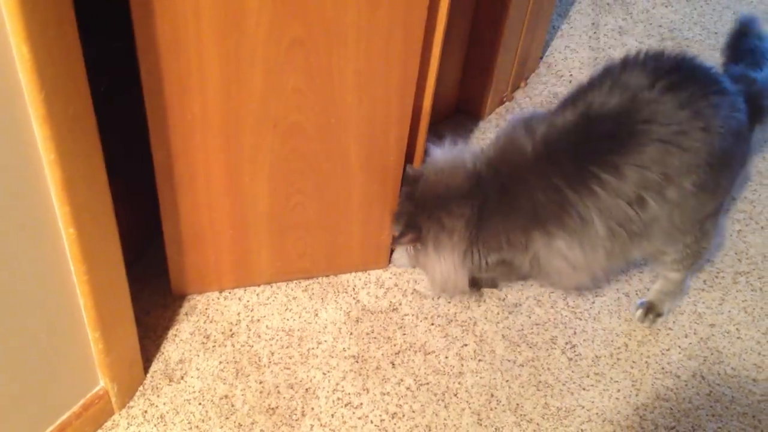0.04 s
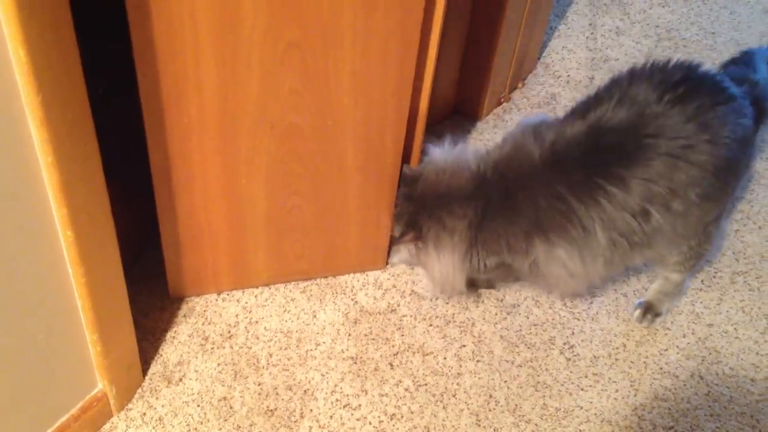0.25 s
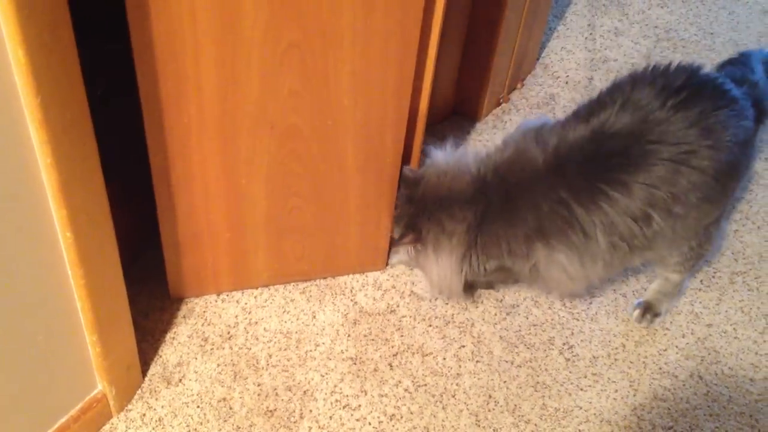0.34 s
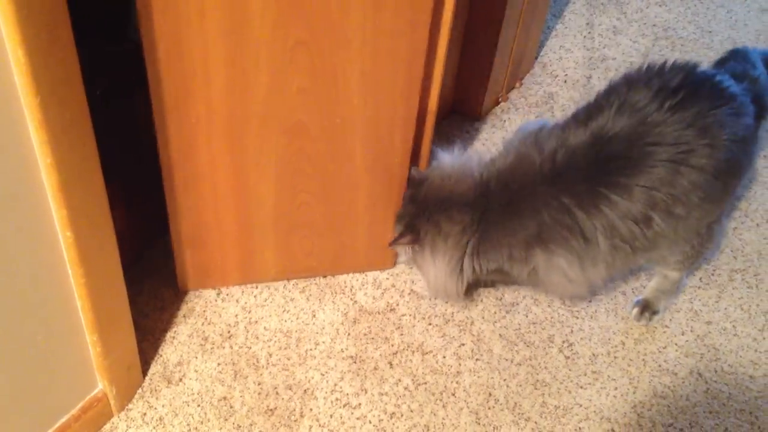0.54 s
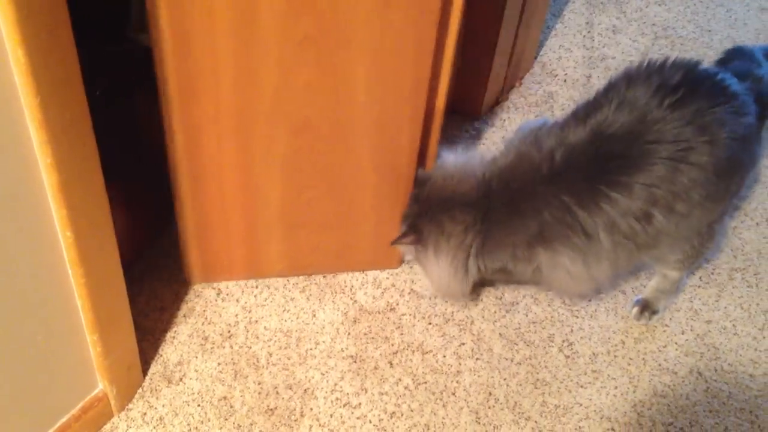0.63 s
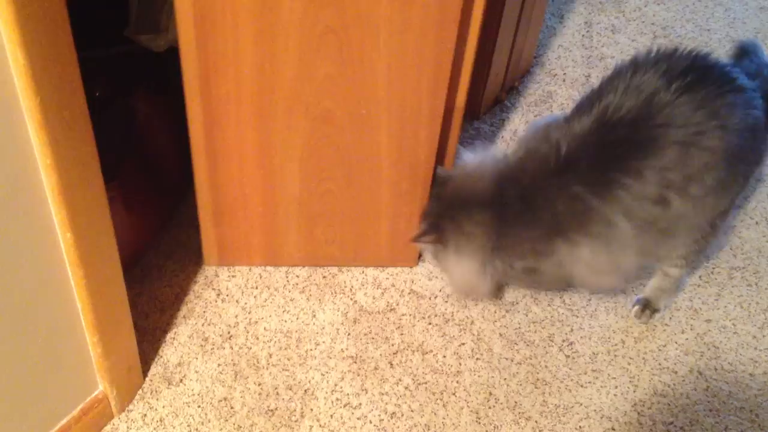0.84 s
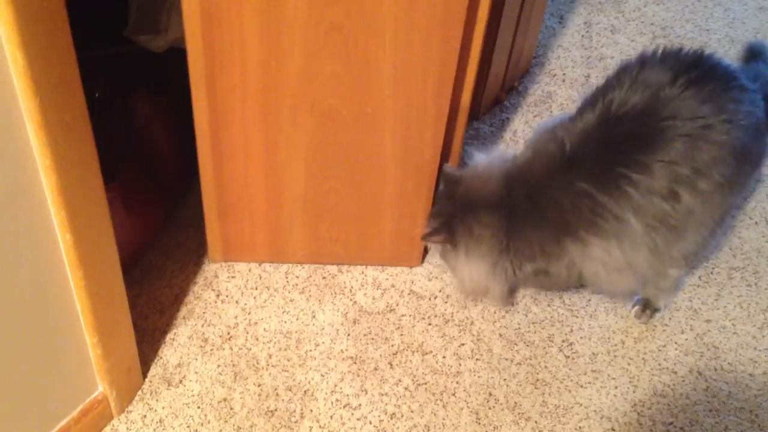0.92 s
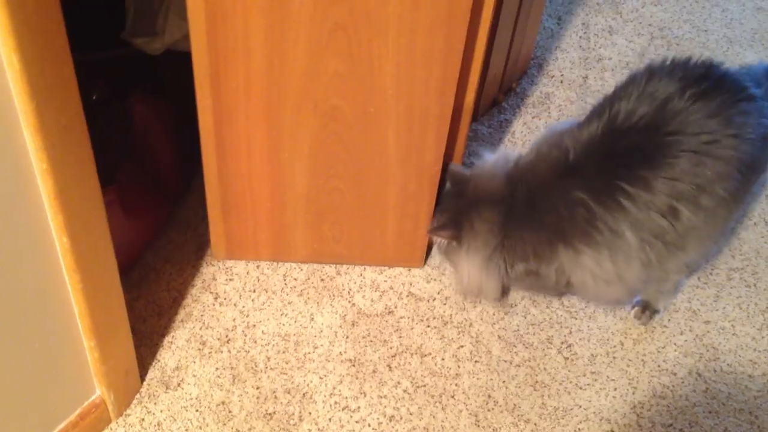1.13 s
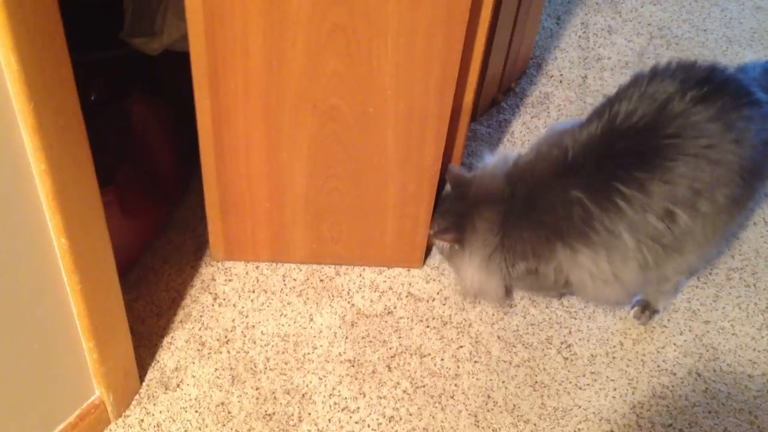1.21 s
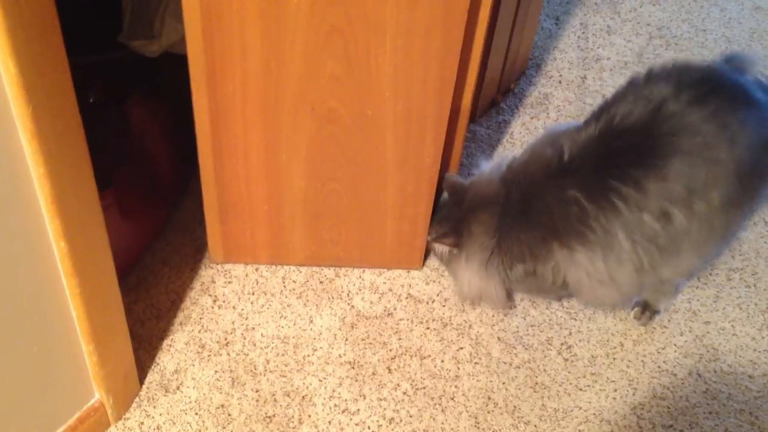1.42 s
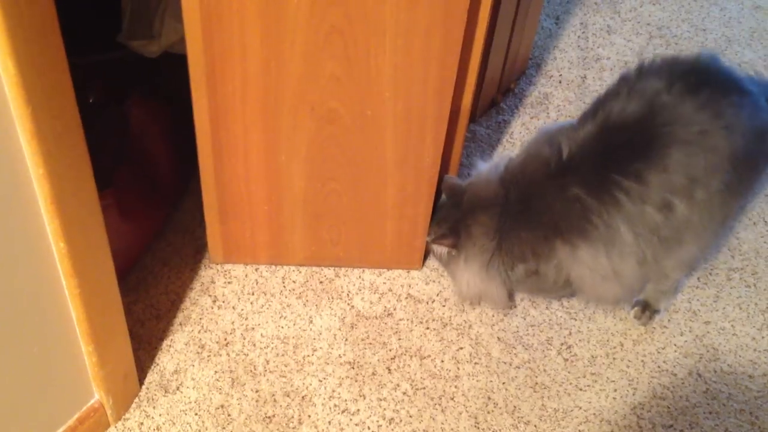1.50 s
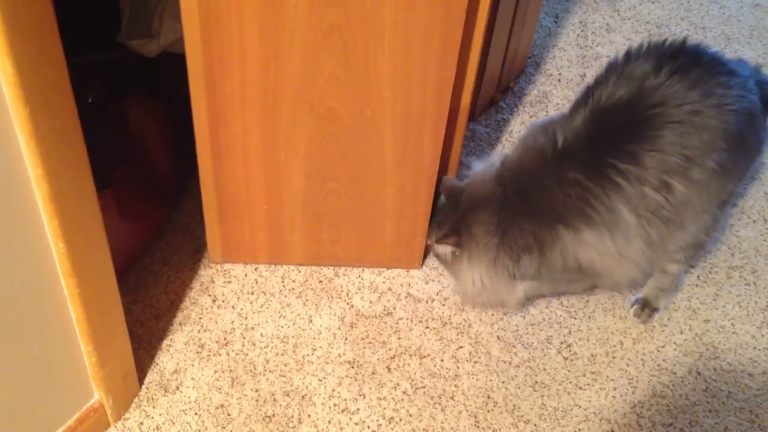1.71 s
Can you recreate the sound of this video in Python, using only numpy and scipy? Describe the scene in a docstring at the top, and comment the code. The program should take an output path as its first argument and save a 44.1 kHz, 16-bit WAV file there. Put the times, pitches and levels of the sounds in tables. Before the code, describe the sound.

Close up in a quiet room, a folding wooden closet door rattles and rubs in its track, creaks upward in pitch, gives one hollow knock, then creaks back down and settles with light ticks.

```python
"""Soft hinge clacks and a dry rub come first: a wooden folding closet door is pushed along its track.
The hollow panel drums and bumps and its fittings tick; the guide sticks and slips in a creak that
rises with speed. The door knocks, then the creak slows and ends in a few ticks and a faint squeak.
One microphone, close to the door, in a quiet carpeted room."""
import sys
import numpy as np
from scipy import signal
from scipy.fft import rfft, irfft, next_fast_len
from scipy.io import wavfile
from scipy.ndimage import map_coordinates

SR = 44100
rng = np.random.default_rng(int(sys.argv[2]) if len(sys.argv) > 2 else 0)


def unload_audio(sound):
    """Save the sound as a 16-bit wav file, at the path given as the first command line argument."""
    columns = np.transpose(np.atleast_2d(sound))
    # keep every value between -1 and 1, then stretch to whole-number steps
    steps = np.round(np.clip(columns, -1, 1) * 32767)
    wavfile.write(sys.argv[1], SR, steps.astype(np.int16))


N = 77175  # 1.75 s


def amp(db):
    """Decibels to gain."""
    return 10 ** (np.asarray(db) / 20)


def unit(x):
    """Scaled to rms 1."""
    return x / np.sqrt(np.mean(x ** 2) + 1e-20)


def along(points, hz):
    """(Hz, value) points read on a log frequency axis."""
    freqs, values = np.transpose(points)
    return np.interp(np.log(hz + 1e-3), np.log(freqs), values)


def curves(rows):
    """One value per sample for each column after the time."""
    times, *columns = np.transpose(rows)
    return [np.interp(np.arange(N) / SR, times, column) for column in columns]


def wobble(rate):
    """A smooth random curve, rate knots a second."""
    knots = rng.standard_normal(int(N * rate / SR) + 4)
    return map_coordinates(knots, [np.arange(N) * rate / SR])


def filtered(x, response):
    """x shaped by a gain that depends on frequency."""
    size = next_fast_len(len(x) + 8192)
    return irfft(rfft(x, size) * response(np.fft.rfftfreq(size, 1 / SR)), size)[:len(x)]


def noise(colour, size=N):
    """Coloured noise of rms 1."""
    return unit(filtered(rng.standard_normal(size), lambda hz: amp(along(colour, hz))))


def ring(colour, t60):
    """A dense cloud of modes, each band dying at its own speed."""
    hz, t, bands = signal.stft(noise(colour, size=SR // 3), SR, nperseg=256)
    decay = amp(-60 * t / along(t60, hz)[:, None])
    return signal.istft(bands * decay, SR, nperseg=256)[1]


def strike(colour, t60, crack_db=-14, crack_s=0.0032):
    """A hard contact: a brief crack on top of a dense ring."""
    x = ring(colour, t60)
    crack = amp(crack_db) * np.exp(-np.arange(len(x)) / SR / crack_s)
    return x * (1 + crack) / np.sqrt(2)


def add(out, s, x):
    """Mix x into out at s seconds."""
    part = out[max(round(s * SR), 0):][:len(x)]
    part += x[:len(part)]


def low_cut(x, cut_hz=176):
    """Little bass gets through: everything below about cut_hz is cut away."""
    return signal.sosfilt(signal.butter(3, cut_hz, "high", fs=SR, output="sos"), x)


# Decay of closet and carpeted room: (frequency [Hz], t60 [s])
ROOM_DECAY = [(200, 0.35), (2000, 0.14), (10000, 0.12)]
def in_room(x, wet_db):
    """Direct sound plus the short answer of closet and room, the answer set wet_db above or below the direct
    sound."""
    tail = ring([(1, 0)], ROOM_DECAY)
    wet = signal.fftconvolve(x, tail / np.linalg.norm(tail))[:N]
    return (x + amp(wet_db) * wet) / np.hypot(1, amp(wet_db))


# Quiet air at the microphone: (frequency [Hz], level [dB])
AIR_COLOUR = [(25, -42), (80, -28), (125, -3.5), (270, -5), (450, -16.5), (900, -14), (1250, -27.5),
              (2300, -37), (3000, -34), (6000, -24.5), (8500, -30), (9800, -39.5), (11500, -27),
              (13000, -24.5), (15500, -27)]
def room_tone():
    """The steady hush of the room, under everything."""
    return amp(-70) * noise(AIR_COLOUR)


# Friction along the track: (time [s], level [dB])
RUB_LEVEL = [(0, -69), (.03, -58.5), (.08, -70), (.16, -71.5), (.2, -60), (.27, -68.5), (.44, -67),
             (.46, -62), (.55, -51.5), (.64, -66), (.8, -64.5), (.87, -48), (.92, -58), (1.0, -55),
             (1.1, -54), (1.182, -52), (1.205, -69), (1.27, -59.5), (1.32, -71.5), (1.4, -74),
             (1.75, -74.5)]
# Its tone: (frequency [Hz], level [dB])
RUB_TONE = [(200, -12.5), (700, 0), (2200, 3), (4400, -4), (6000, -7.5), (8500, -9), (12000, -16.5),
            (15500, -17)]
def guide_rub(grain_db=1):
    """The guide rubs dryly in the track with a grainy hiss."""
    grainy = noise(RUB_TONE) * amp(grain_db * wobble(500))
    return amp(curves(RUB_LEVEL)[0]) * unit(grainy)


# Modes of the hollow panel, also rung by its bumps: (frequency [Hz], level [dB], t60 when bumped [s])
PANEL_MODES = [(152, -36.5, 0.24), (190.3, -12, 0.24), (239.3, -14, 0.11), (283.3, 0.5, 0.14),
               (340, -17, 0.19), (406.2, -14, 0.23), (472.3, -16, 0.21), (622, -21, 0.12),
               (693.2, -10.5, 0.19), (828, -18, 0.2), (912, -21, 0.24), (1079, -17.5, 0.26),
               (1350, -22, 0.12), (1565, -15.5, 0.12)]
# Drumming of the travelling panel: (time [s], level [dB])
DRUM_LEVEL = [(0, -61), (.18, -58.5), (.24, -45.5), (.36, -64.5), (.46, -50.5), (.53, -63), (.64, -61.5),
              (.79, -56), (.85, -40.5), (.99, -59.5), (1.1, -64.5), (1.18, -53.5), (1.24, -57.5),
              (1.42, -69), (1.75, -70)]
# Its broad rumble: (frequency [Hz], level [dB])
DRUM_TONE = [(25, -52), (42, -61), (62, -19.5), (95, -28), (140, -16.5), (190, -1), (235, -7), (285, -2),
             (340, -2.5), (430, -7), (560, -18.5), (1200, -25.5), (4000, -78)]
def panel_drum(modes_db=1.5, top_hz=970):
    """The moving panel drums low, partly at its modes."""
    def resonance(f):
        modes = sum(amp(db) / (1 + 1j * (f - hz) * t60) for hz, db, t60 in PANEL_MODES)
        return modes / (1 + (f / top_hz) ** 4)
    rumble = noise(DRUM_TONE)
    ringing = unit(low_cut(filtered(rng.standard_normal(N), resonance)))
    return amp(curves(DRUM_LEVEL)[0]) * unit(rumble + amp(modes_db) * ringing)


# Clacks at the hinges: (time [s], level [dB], ring [Hz])
HINGE_CLACKS = [(.01, -62.5, 2500), (.031, -50.5, 2040), (0.2983, -48, 2570), (0.306, -55.5, 2770),
                (0.381, -47, 2260), (.388, -49.5, 1650)]
# Their tone: (frequency [multiple of the ring], level [dB])
CLACK_TONE = [(.1, -7), (.3, -6), (.65, -12), (1, -0.5), (1.45, -23), (3, -21.5), (6, -36)]
# Their decay: (frequency [Hz], t60 [s])
CLACK_DECAY = [(500, 0.16), (3000, 0.14), (10000, 0.027)]
def hinge_clacks():
    """Play in the hinges gives dull clacks, each with its own ring."""
    out = np.zeros(N)
    for s, db, hz in HINGE_CLACKS:
        colour = [(hz * ratio, level) for ratio, level in CLACK_TONE]
        add(out, s, amp(db) * strike(colour, CLACK_DECAY))
    return out


# Soft bumps of the panel: (time [s], level [dB], contact time [s])
PANEL_BUMPS = [(.056, -41, 0.0043), (0.13, -46, 0.0035), (.226, -38.5, 0.0013), (.2507, -33, 0.0059),
               (0.3243, -36.5, 0.0051), (.404, -36.5, 0.0029), (0.44, -45, 0.0039), (.825, -36, .0005),
               (0.8394, -32, 0.00076), (0.8566, -31, 0.0057), (1.187, -54, 0.0018)]
def panel_bumps(scatter_db=2.6):
    """Each bump rings the panel; a longer contact leaves out the high modes."""
    out, t = np.zeros(N), np.arange(SR // 2) / SR
    for s, db, contact in PANEL_BUMPS:
        attack = 1 - np.exp(-t / contact)
        for hz, level, t60 in PANEL_MODES:
            decay = amp(level + rng.normal(0, scatter_db) - 60 * t / t60)
            drive = amp(db) / (1 + (hz * contact / 2.05) ** 3)
            add(out, s, drive * attack * decay * np.sin(2 * np.pi * hz * t))
    return in_room(out, wet_db=-17)


# Ticks of the fittings: (time [s], level [dB], tilt [dB per octave])
FITTING_TICKS = [(.172, -50, 1), (.1765, -55, -3), (.197, -76, -10), (0.226, -51.5, -2.5),
                 (0.2293, -58.5, -9), (0.35, -60, -5.5), (.4274, -58, -3.5), (0.8334, -42, 1.5),
                 (0.84, -47, 15), (0.9323, -47.5, 3), (0.966, -46, -1.5), (1.052, -57, 1), (1.1263, -45, 0),
                 (1.2178, -41.5, 0.5), (1.2226, -44.5, -4), (1.253, -50, 1), (1.2845, -49.5, -4),
                 (1.289, -54, 5), (1.3334, -51, -4.5), (1.338, -52.5, -0.5)]
# Their tone before the tilt: (frequency [Hz], level [dB])
TICK_TONE = [(200, -11), (1300, -14), (2200, 3), (3200, -1), (4500, 2), (6000, -4), (8300, 4.5),
             (10000, -5), (12500, 0), (15500, -16)]
# Their decay: (frequency [Hz], t60 [s])
TICK_DECAY = [(500, 0.4), (3000, 0.12), (12000, 0.095)]
def fitting_ticks(pivot_hz=5000):
    """The fittings tick, sharp and close, some brighter than others."""
    out = np.zeros(N)
    for s, db, tilt in FITTING_TICKS:
        colour = [(hz, level + tilt * np.log2(hz / pivot_hz)) for hz, level in TICK_TONE]
        add(out, s, amp(db) * strike(colour, TICK_DECAY))
    return out


def slip_pulses(stroke, flutter_db=2, waver=0.012, jitter=0.33, scatter_db=1.04):
    """Stick and slip: one pulse per slip, each wait a little different."""
    hz, db, uneven, limp = curves(stroke)
    db = db + flutter_db * wobble(140)  # the pressure on the guide flutters
    cycles = np.cumsum(hz * (1 + waver * wobble(150))) / SR
    timing, strength, wait = rng.standard_normal((8192, 3)).T  # one draw of each per slip
    cycles += np.cumsum(hz * uneven * wait[cycles.astype(int)]) / SR
    slip = np.arange(1, int(cycles[-1]))
    at = np.interp(slip, cycles, np.arange(N))  # in samples
    in_stroke = (at > stroke[0][0] * SR) & (at < stroke[-1][0] * SR)
    at, slip = at[in_stroke], slip[in_stroke]
    i = at.astype(int)
    shift_cycles = jitter * timing[slip] * uneven[i] + limp[i] * (-1) ** slip / 2
    at = at + shift_cycles * SR / hz[i]
    size = amp(db[i] + scatter_db * strength[slip]) * np.sqrt(SR / hz[i])
    taps = at.astype(int)[:, None] + np.arange(-7, 9)
    offset = taps - at[:, None]
    pulses = size[:, None] * np.sinc(offset) * np.sinc(offset / 8)  # placed between samples
    return np.bincount(taps.ravel(), pulses.ravel(), N)[:N]


# The guide speeding up, then slowing; limp makes alternate slips early and late:
# (time [s], slip rate [Hz], level [dB], unevenness [cycles], limp [cycles])
SPEEDING_STROKE = [(.448, 482.4, -61, 0.12, 0), (.456, 602, -47.5, .13, 0.013), (.478, 733.4, -48, 0.1, 0),
                   (.52, 1028, -48, 0.11, 0.062), (.55, 1086, -48.5, 0.05, 0.047),
                   (.575, 1441, -44.5, 0.051, 0.13), (.605, 1580, -48, 0.026, 0.0033),
                   (.62, 1870, -45, 0.018, 0), (.645, 1980, -49, .022, 0.021),
                   (.695, 2318, -51, 0.048, 0.0049), (.72, 2470, -55, 0.041, 0),
                   (.738, 2843, -51.5, 0.034, 0.014), (.78, 2900, -59.5, 0.058, 0.029),
                   (.82, 2880, -53, .035, 0)]
SLOWING_STROKE = [(.89, 2450, -56, .09, 0), (.925, 2271, -54.5, 0.083, 0), (.965, 1992, -58, 0.096, 0.015),
                  (.995, 1401, -47, 0.063, .05), (1.008, 1012, -54, 0.044, 0),
                  (1.042, 951.6, -44, 0.027, 0.037), (1.06, 925.5, -49, 0.034, 0.046),
                  (1.078, 903, -42, 0.025, 0), (1.11, 757.2, -47, 0.054, 0.019),
                  (1.133, 451.8, -50, 0.08, 0), (1.183, 380.2, -49.5, 0.13, 0),
                  (1.205, 239.7, -66.5, .14, 0)]
# Tone of each stroke: (frequency [Hz], level [dB])
SPEEDING_TONE = [(100, -23), (250, -16), (600, -2), (1000, -1), (1400, -2.5), (2150, 2.5), (3000, -2),
                 (4100, 0.5), (5200, -5), (6100, -6), (7500, -6.5), (9000, -2.5), (10500, -14),
                 (12000, -8.5), (13200, -21), (16000, -38)]
SLOWING_TONE = [(100, -25), (250, -6), (430, 12.5), (620, 4.5), (900, -1.5), (1300, -5.5), (1850, 1),
                (2700, -2.5), (3500, -8), (4400, -4.5), (5500, -14), (9000, -8.5), (12500, -20),
                (16000, -39)]
# Resonances of the metal track: (frequency [Hz], width [Hz], boost [dB])
TRACK_MODES = [(835, 87, 0.5), (1060, 31, 4.5), (1540, 88, 4), (1898, 56, 4), (2220, 76, 9.5),
               (2704, 210, 8), (4140, 250, 3), (5920, 320, 2), (8770, 240, 2)]
def guide_creak(stroke, colour, soft_above_hz=2230, soft_cut_hz=6600):
    """The slips ring the track and carry into the room: a rasp when slow, a squeak when fast."""
    def track(f):
        peaks_db = sum(boost / (1 + (2 * (f - hz) / width) ** 2) for hz, width, boost in TRACK_MODES)
        return unit(amp(along(colour, f) + peaks_db))
    sharp = slip_pulses(stroke)
    rounded = filtered(sharp, lambda f: 1 / (1 + (f / soft_cut_hz) ** 4))
    slip_hz = curves(stroke)[0]
    soft = 1 / (1 + (soft_above_hz / slip_hz) ** 8)  # faster slips are rounder
    pulses = (1 - soft) * sharp + soft * rounded
    return in_room(filtered(pulses, track), wet_db=2)


# Hard contacts of the knock: (time [s], level [dB])
KNOCK_CONTACTS = [(0.8196, -38.5), (0.8251, -35.5), (0.8381, -36.5)]
# Their tone: (frequency [Hz], level [dB])
KNOCK_TONE = [(90, -32), (140, -11), (200, 6), (400, 4.5), (800, -6.5), (1200, -5), (1600, 3), (2600, -6),
              (4400, -5), (6500, -12), (11000, -10.5), (15000, -21)]
# Their decay: (frequency [Hz], t60 [s])
KNOCK_DECAY = [(200, 0.22), (2000, 0.17), (10000, 0.044)]
def door_knock():
    """Three quick hard contacts reach the microphone as one wooden knock."""
    out = np.zeros(N)
    for s, db in KNOCK_CONTACTS:
        add(out, s, amp(db) * strike(KNOCK_TONE, KNOCK_DECAY))
    return out


# The faint last squeak: (time [s], pitch [Hz], level [dB])
LAST_SQUEAK = [(1.485, 2460, -93), (1.505, 2450, -75), (1.54, 2420, -84), (1.6, 2400, -82),
               (1.64, 2440, -100)]
def settling_squeak(waver=0.012):
    """The door settles with a thin, wavering tone."""
    hz, db = curves(LAST_SQUEAK)
    cycles = np.cumsum(hz * (1 + waver * wobble(180))) / SR
    return amp(db) * unit(np.sin(2 * np.pi * cycles))


def scene():
    """The door, close by and in mono, over the quiet air of the room."""
    creak = guide_creak(SPEEDING_STROKE, SPEEDING_TONE) + guide_creak(SLOWING_STROKE, SLOWING_TONE)
    contacts = panel_bumps() + door_knock() + fitting_ticks() + hinge_clacks()
    door = low_cut(creak + contacts) + guide_rub() + panel_drum() + settling_squeak()
    return (door + room_tone())[None]


def record(dry, top_hz=15700):
    """The recorder keeps nothing above its band limit."""
    return np.array([filtered(x, lambda hz: hz < top_hz) for x in dry])


dry = scene()
out = record(dry)
unload_audio(out)
```